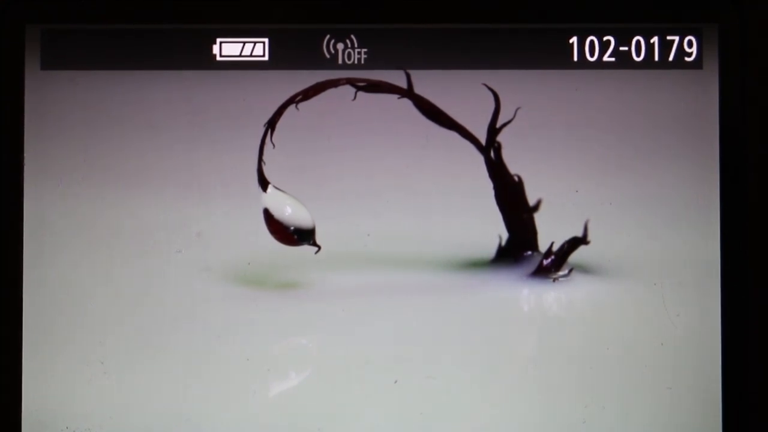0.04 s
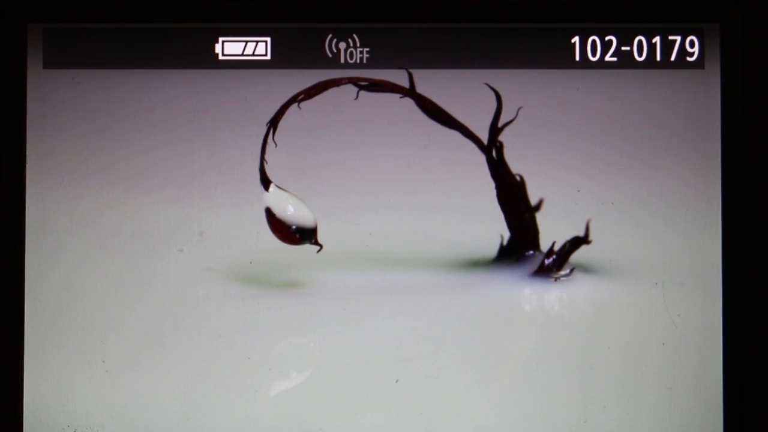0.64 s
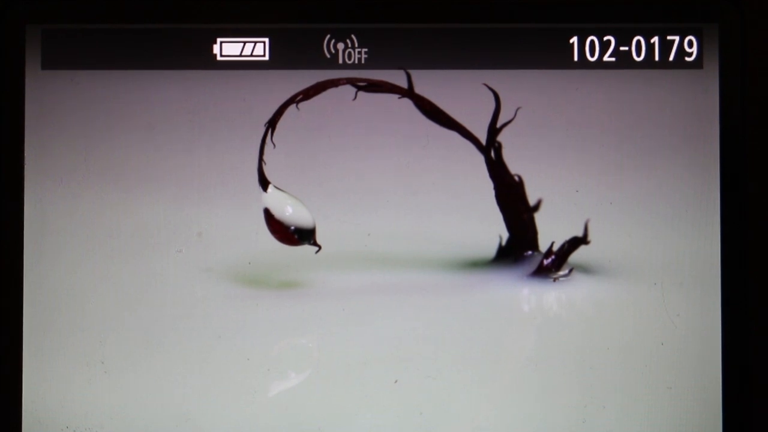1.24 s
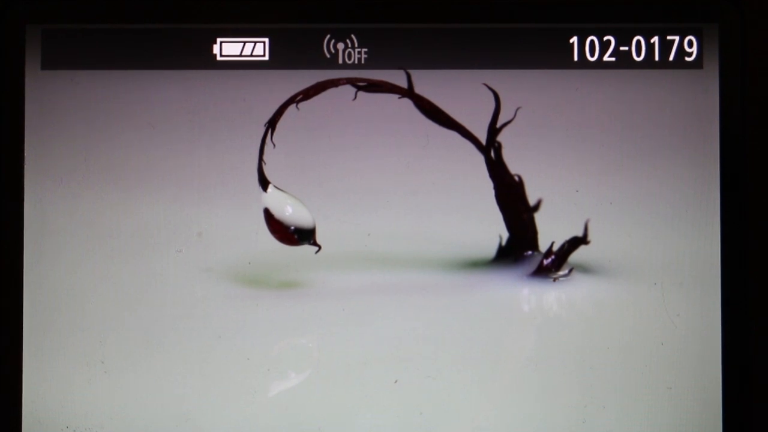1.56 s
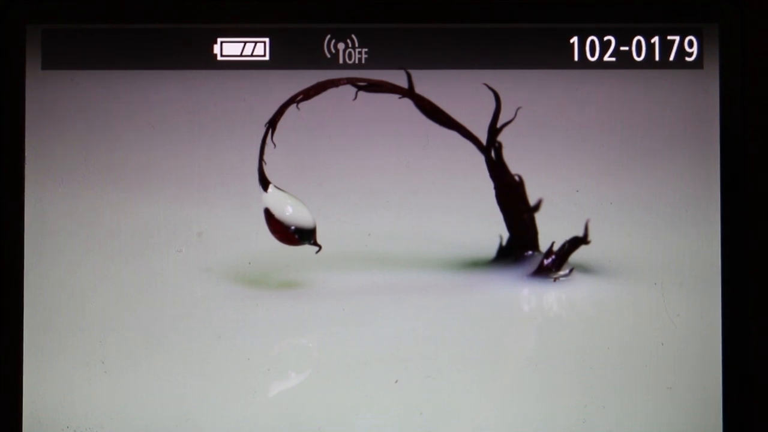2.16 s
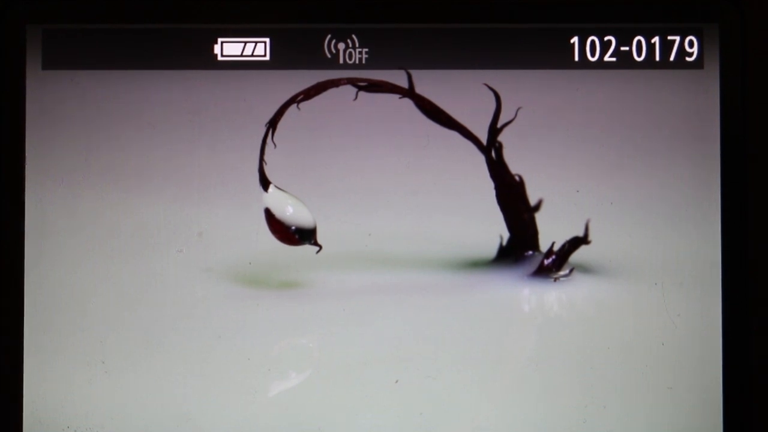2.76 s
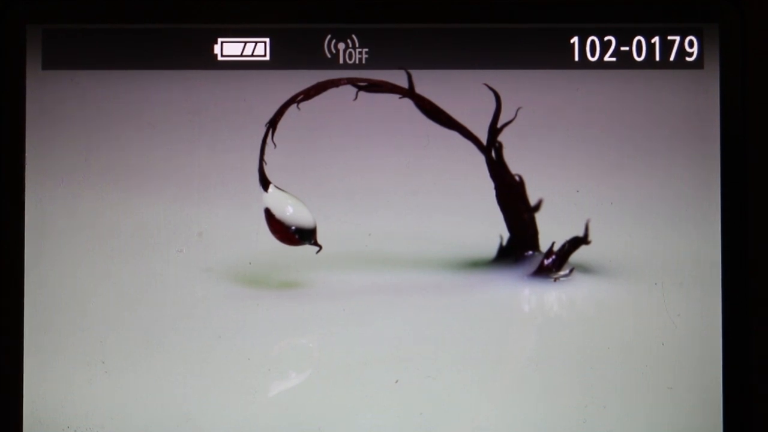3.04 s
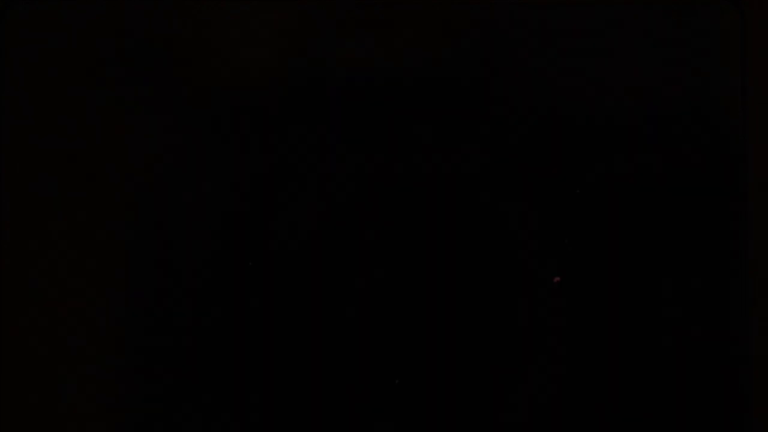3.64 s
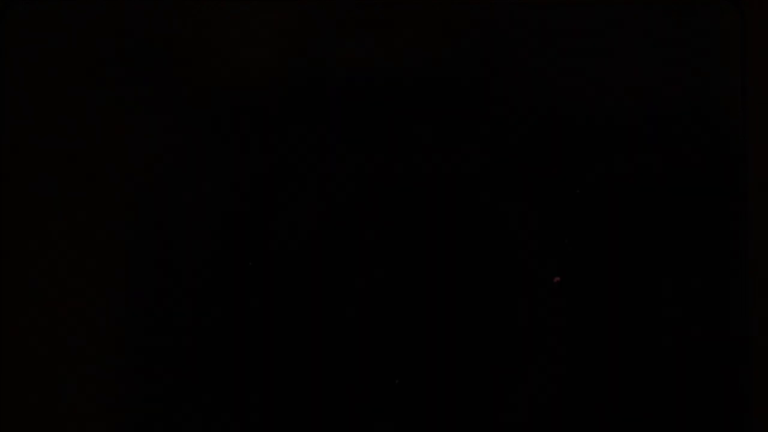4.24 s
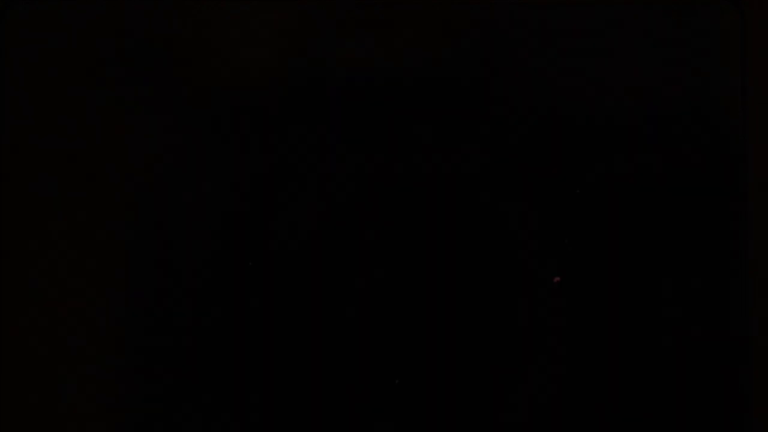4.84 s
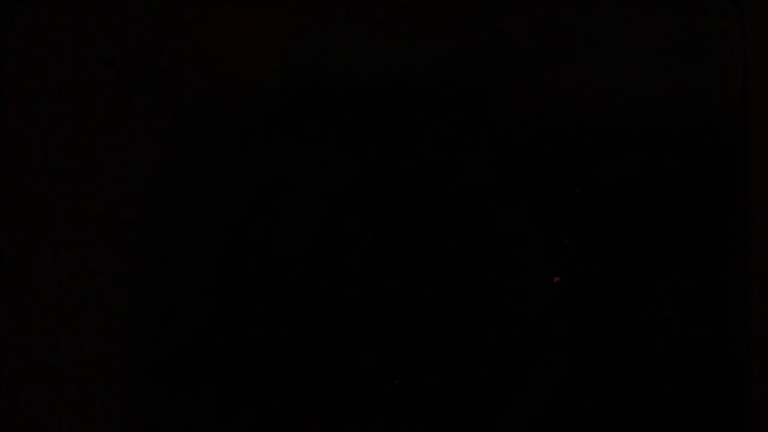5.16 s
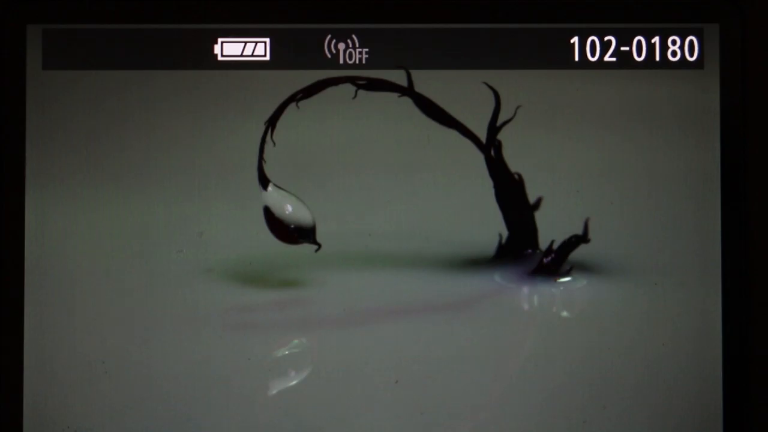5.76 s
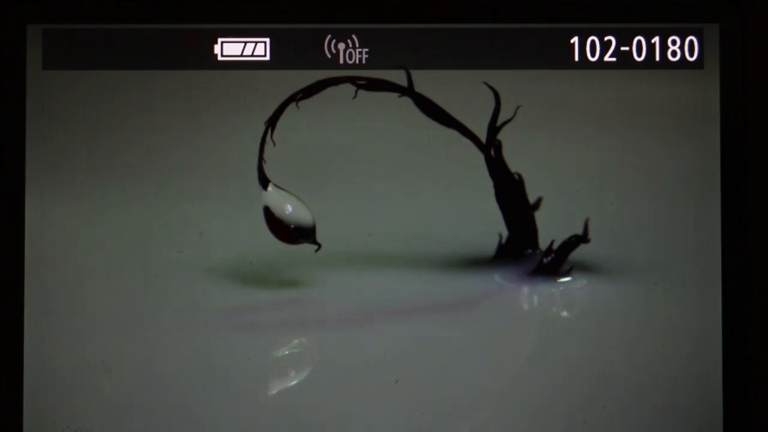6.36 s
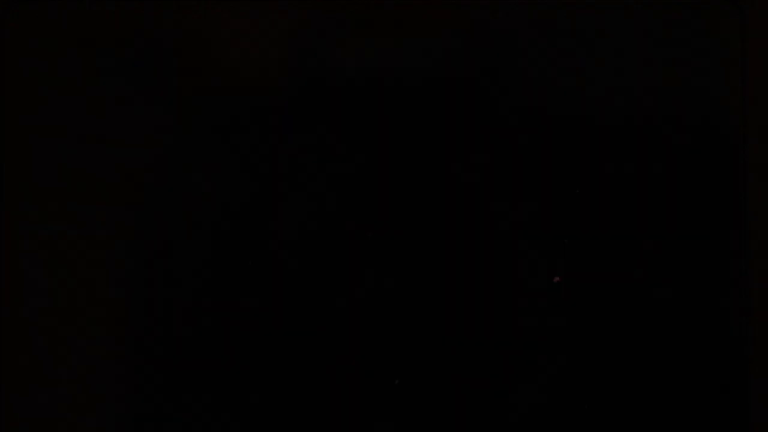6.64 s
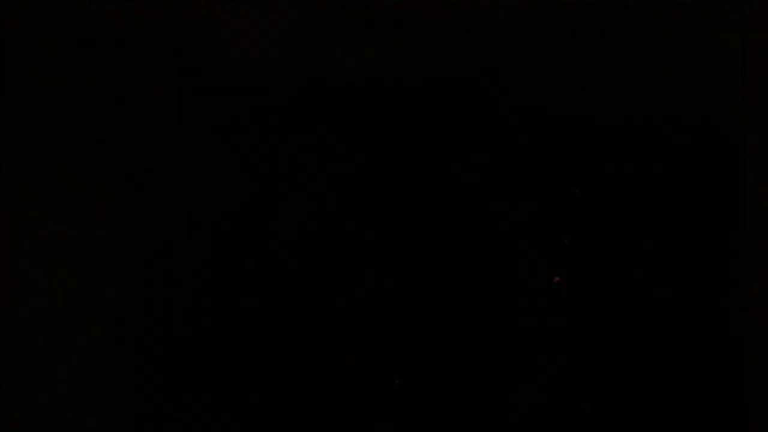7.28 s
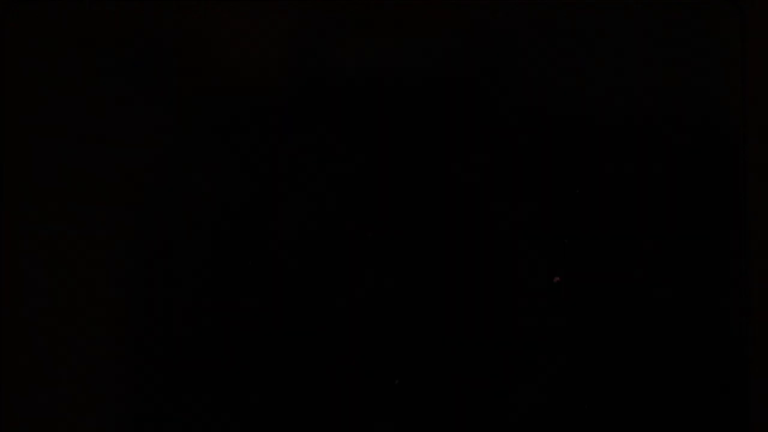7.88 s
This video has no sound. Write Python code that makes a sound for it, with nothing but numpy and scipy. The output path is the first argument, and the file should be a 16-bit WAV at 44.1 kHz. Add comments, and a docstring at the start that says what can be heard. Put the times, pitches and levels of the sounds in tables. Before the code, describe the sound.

In a quiet room, cloth brushes past and something small ticks, followed by a cluster of dull knocks and faint rubbing. After a brief soft scrape, a reflex camera fires close to the microphone with a quick mechanical clack of mirror and shutter. Another short scrape follows, and the camera fires again the same way. The two shots are the loudest sounds, over faint hiss and a low drone.

```python
"""A brush of cloth and a small hard tick, then dull knocks, rubbing and two short scrapes in a quiet room.
Amid this handling a reflex camera fires twice, close to the microphone and louder than all the rest.
Each firing is the same quick chain of blows ringing the body: mirror up, curtains, springs recocked,
mirror down. Rubbing is noise roughened by small slips. Short wall reflections, hiss and a low drone
lie behind."""
import sys
import numpy as np
from scipy import signal
from scipy.fft import rfft, irfft
from scipy.io import wavfile
from scipy.ndimage import uniform_filter1d

SR = 44100
rng = np.random.default_rng(int(sys.argv[2]) if len(sys.argv) > 2 else 0)


def bounce(signal):
    """Save signal as a 16-bit WAV file at the path given by the first command-line argument."""
    frames = np.transpose(np.atleast_2d(signal))
    limited = np.clip(frames, -1, 1)
    pcm = np.round(limited * 32767).astype(np.int16)
    wavfile.write(sys.argv[1], SR, pcm)


N = 353329
FFT_SIZE = 8192
HZ = np.fft.rfftfreq(FFT_SIZE, 1 / SR)

# Each row: time the mirror hits its upper stop in seconds, gain in dB.
FIRINGS = [(4.1850, -0.5), (6.7119, 0)]
# Mirror, curtain and spring blows. Each row: delay from that hit in seconds, level in dB,
# run-up and rattle in seconds, thump and treble in dB, pitch of the struck part in Hz.
FIRING_BLOWS = [(-.003, -28.5, .0059, .001, 0.5, 3, 2200), (.0002, -19, .0016, .002, 5, 0.5, 2760),
                (.002, -23.5, .0012, .0022, 9, -1, 864), (0.0424, -24, .0001, .0026, -1.5, 3, 7700),
                (0.0485, -27.5, .0001, .0014, -2, 6, 12500), (.053, -28.5, .001, .0014, 0, 3.5, 1800),
                (0.0571, -20, .00005, .0016, 4, 7, 2950), (0.064, -26.5, .0005, .0025, 1, -11, 3720),
                (.082, -17, .0008, .0023, -5, -4, 3320), (.0894, -29, .0015, .0031, 1, 3.5, 3820),
                (.096, -29.5, .0002, .001, -7, -12, 3600), (.106, -25.5, .001, .0034, -6, 4.5, 2700),
                (0.108, -36.5, .0004, .0015, -4.5, 15.5, 13000), (.122, -23, .0018, .0055, 3.5, 1.5, 780)]
# Each row: time in seconds, then as in FIRING_BLOWS from the level on.
RELEASE_CLICKS = [(6.686, -43, .0002, 0.0023, -5, 6, 3205), (6.6893, -34.5, 0.00017, 0.00077, 0, 1, 2790)]
# One row: run-up and rattle in seconds, thump and treble in dB, pitch in Hz.
REBOUND_SHAPE = (0.17, 0.01, 2, 0, 1900)
# Each row: frequency in Hz, width in Hz, level in dB.
CAMERA_MODES = [(238, 300, -14.5), (412, 140, -17.5), (594, 96, -6), (850, 170, 2), (1310, 520, -6),
                (2130, 410, -1.5), (2600, 330, 1.5), (2990, 405, 4), (3730, 510, 2), (4130, 230, -3),
                (4930, 950, -7.5), (6400, 1600, -6.5), (7960, 1500, -6.5), (9900, 3300, -12.5),
                (13000, 3000, -19)]


def shutter(rebound_count=3, first_s=.137, gap_s=.023, first_db=-26.5, loss_db=3.5):
    """The release clicks; springs drive each firing alike, and the mirror settles in weakening rebounds."""
    rebounds = [(first_s + k * gap_s, first_db - k * loss_db, *REBOUND_SHAPE)
                for k in range(rebound_count)]
    rows = [(hit_s + delay_s, db + gain_db, *shape)
            for hit_s, gain_db in FIRINGS for delay_s, db, *shape in FIRING_BLOWS + rebounds]
    return blows(RELEASE_CLICKS + rows, CAMERA_MODES, part_db=2.5)


# Each row: time in seconds, level in dB, rattle in seconds, pitch in Hz.
KNOCKS = [(1.411, -53.5, .004, 915), (1.539, -42.5, 0.008, 630), (1.583, -38, 0.021, 590),
          (1.6255, -35.5, 0.002, 830), (1.641, -30, 0.015, 760), (1.656, -31, 0.0065, 584),
          (1.669, -29, 0.023, 1900), (1.688, -28.5, 0.021, 550), (1.7, -27, 0.027, 550),
          (1.762, -36.5, 0.005, 450), (1.773, -33.5, 0.014, 424), (3.24, -53.5, 0.0064, 1140),
          (4.034, -58.5, 0.004, 1370), (6.5, -52.5, 0.0029, 2630), (6.599, -48, 0.0029, 1240)]
# Each row: frequency in Hz, width in Hz, level in dB.
TABLE_MODES = [(189, 220, -11), (404, 160, -15.5), (630, 410, -5.5), (1200, 150, -4), (1865, 550, -3),
               (2640, 400, -5), (7350, 10000, -19)]


def knocks(run_up_share=.11, treble_db=-3.5):
    """Dull knocks ring the table: long ones start softly, low ones thump."""
    rows = []
    for time_s, db, rattle_s, hz in KNOCKS:
        thump_db = 13 - 4.5 * np.log2(hz / 600)
        rows.append((time_s, db, run_up_share * rattle_s, rattle_s, thump_db, treble_db, hz))
    return blows(rows, TABLE_MODES, part_db=3.5, part_width=0.32)


# Each row: time in seconds, level in dB, run-up and rattle in seconds, thump and treble in dB, pitch in Hz.
TICKS = [(.7861, -35, 0.000059, 0.0023, 1.5, -3, 3670), (.812, -43, 0.014, 0.0046, 9, -1, 1240),
         (2.927, -61.5, 0.00034, .001, -10, 3, 9000)]
# Each row: frequency in Hz, width in Hz, level in dB.
TICK_MODES = [(656, 250, -3.5), (1240, 310, -3), (1940, 480, 0.5), (3580, 740, -1), (4770, 970, 0.5),
              (6030, 800, -2.5), (8140, 1300, -10), (11800, 2300, -19)]


def ticks():
    """Light blows ring a small hard object."""
    return blows(TICKS, TICK_MODES, part_db=-1)


# Each row: peak time in seconds, level in dB, swell and fade in seconds, relative hiss in dB, pitch in Hz.
STROKES = [(.89, -65, 0.0095, 0.053, -10, 880), (1.455, -59.5, .02, 0.021, -10, 700),
           (1.564, -50, 0.013, 0.034, -5.5, 2320), (1.646, -39.5, .005, 0.051, -17, 2620),
           (1.76, -58.5, 0.062, .05, 8, 2400), (1.93, -61, 0.059, 0.036, 6.5, 2400),
           (2.105, -47.5, 0.028, 0.017, -1, 2300), (2.128, -48.5, 0.016, 0.03, -7, 2880),
           (2.175, -53, 0.013, 0.024, -1.5, 2630), (2.214, -47, 0.0074, .042, -2, 4740),
           (2.425, -59, 0.011, 0.033, -2, 2780), (2.603, -54.5, .013, 0.036, -11.5, 2380),
           (2.825, -52.5, .018, 0.021, -10.5, 2850), (3.258, -57, 0.0079, 0.025, -12.5, 990),
           (5.812, -58.5, .016, 0.025, -10, 2760), (6.621, -61, 0.046, 0.11, -7, 1190)]
# Two spectra of rubbing. Each row: frequency in Hz, level in dB.
FRICTION_SPECTRUM = [(350, -27), (650, -2.5), (1150, -0.5), (1750, -2), (2180, 0), (2360, 2.5),
                     (2560, -1.5), (3050, -4.5), (3500, -6), (6000, -56)]
HISS_SPECTRUM = [(2500, -12.5), (4000, -2), (5000, -3), (7500, -2.5), (10000, -6), (14000, -13),
                 (16000, -21)]


def strokes():
    """Quick rubs hiss and excite the resonance of the rubbed edge."""
    out = np.zeros(N)
    hiss = amp(curve(HISS_SPECTRUM))
    for peak_s, db, swell_s, fade_s, hiss_db, edge_hz in STROKES:
        friction = peaked(FRICTION_SPECTRUM, edge_hz, width_share=.22, db=3.5)
        add(out, *short_rub(peak_s, swell_s, fade_s, [(friction, db), (hiss, db + hiss_db)]))
    return out


# Each row: time in seconds, pressure in dB.
SLIDE_PRESSURE = [(1.39, -64), (1.456, -63.5), (1.716, -48.5), (1.774, -49.5), (1.908, -57), (2.204, -61),
                  (2.704, -59), (2.894, -59), (2.98, -75)]
# Each row: frequency in Hz, level in dB.
GROAN_SPECTRUM = [(70, -20), (150, -8), (230, -4.5), (295, -7), (335, 1.5), (400, -3), (460, -7.5),
                  (800, -14), (1500, -69)]


def slide(groan_db=1, friction_db=-2, hiss_db=-9.5):
    """Something slides slowly over the table; one pressure drives low groan, friction and hiss."""
    out = np.zeros(N)
    times_s, pressure_db = np.transpose(SLIDE_PRESSURE)
    force = amp(np.interp(np.arange(times_s[0], times_s[-1], 1 / SR), times_s, pressure_db))
    layers = [(GROAN_SPECTRUM, groan_db), (FRICTION_SPECTRUM, friction_db), (HISS_SPECTRUM, hiss_db)]
    add(out, times_s[0], rubbing(force, [(amp(curve(spectrum)), db) for spectrum, db in layers]))
    return out


# Each row: midpoint in seconds, level in dB, length in seconds, slips per second.
SCRAPES = [(3.753, -55.5, .082, 510), (5.974, -48.5, .072, 480)]
# One list per scrape. Each row: frequency in Hz, width in Hz, level in dB.
SCRAPE_MODES = [
    [(567, 45, 20.5), (1150, 32, 17), (1750, 74, 14), (2570, 190, 9), (3300, 700, 1), (3970, 170, 10.5),
     (5190, 250, -6), (7280, 300, -1), (880, 3400, 1), (8700, 2600, -11)],
    [(380, 59, 3.5), (1170, 42, 4), (1780, 62, 3.5), (2520, 120, 8), (3360, 150, 5), (3725, 140, 6.5),
     (4090, 140, 3), (3180, 1600, -5), (5800, 980, -9), (7840, 1900, -8.5), (910, 3500, -10.5)],
]


def scrapes(jitter=0.28, grit=0.31):
    """An edge stutters over a surface in quick runs of uneven slips that ring it."""
    out = np.zeros(N)
    for (middle_s, db, length_s, slip_hz), modes in zip(SCRAPES, SCRAPE_MODES):
        t = np.arange(-length_s, length_s, 1 / SR)
        slip_count = np.cumsum(slip_hz * np.exp(jitter * wander(len(t), span=100))) / SR
        slips = np.diff(np.floor(slip_count), prepend=0) + grit * rng.standard_normal(len(t))
        envelope = np.maximum(np.cos(np.pi * t / length_s), 0) ** 2
        add(out, middle_s - length_s, amp(db) * unit_rms(ring(slips * envelope, resonances(modes))))
    return out


# Each row: peak time in seconds, level in dB, swell and fade in seconds.
BRUSHES = [(.639, -42.5, 0.0065, 0.011), (.648, -44.5, 0.004, 0.021)]
# Each row: frequency in Hz, level in dB.
CLOTH_SPECTRUM = [(200, -15), (600, -8.5), (950, -16), (1190, -4), (1500, -13), (4200, -14.5), (8500, -9),
                  (11900, -12.5), (13500, -25), (16000, -24)]


def cloth():
    """Cloth brushes past in soft, overlapping contacts."""
    out = np.zeros(N)
    for row in BRUSHES:
        add(out, *contact(*row, amp(curve(CLOTH_SPECTRUM))))
    return out


# Each row: peak time in seconds, level in dB, swell and fade in seconds, pitch in Hz.
SHUFFLES = [(2.232, -55, .015, 0.036, 130), (5.676, -63, 0.03, 0.13, 171.3),
            (6.574, -50.5, 0.0084, 0.046, 112), (7.195, -58, 0.017, 0.13, 200),
            (7.36, -55.5, 0.033, 0.048, 324), (7.882, -56.5, 0.025, 0.037, 260)]
# Each row: frequency in Hz, level in dB.
RUMBLE_SPECTRUM = [(60, -35), (100, -1), (170, 2), (260, -3.5), (370, -7.5), (520, -12.5), (1500, -30.5)]


def shuffles():
    """Soft shuffles and bumps rumble, each with one low resonance."""
    out = np.zeros(N)
    for peak_s, db, swell_s, fade_s, hz in SHUFFLES:
        rumble = peaked(RUMBLE_SPECTRUM, hz, width_share=0.28, db=3.5)
        add(out, *short_rub(peak_s, swell_s, fade_s, [(rumble, db)]))
    return out


# Each row: frequency in Hz, time to fall 60 dB in seconds.
ROOM_T60 = [(150, 0.41), (700, .21), (3000, 0.18), (8000, .21), (15000, .075)]
# Each row: frequency in Hz, gain in dB.
ROOM_SPECTRUM = [(150, 4), (560, -2), (820, -5.5), (1300, 2.5), (2200, 0.5), (3200, -2.5), (5000, -3),
                 (8000, -3.5), (14000, -3)]


def room(x, build_s=0.0012, hold_s=0.034):
    """Wall reflections build and hold for a moment, then each band dies at its own speed."""
    slots = np.arange(100, SR // 2, 12)
    echoes = np.zeros(SR)
    echoes[slots + rng.integers(0, 12, len(slots))] = rng.choice([-1, 1], len(slots))
    hz, t, bands = signal.stft(echoes, SR, nperseg=256)
    fade_db = -60 * np.maximum(t - hold_s, 0) / curve(ROOM_T60, hz)[:, None]
    tail = signal.istft(bands * amp(fade_db) * (1 - np.exp(-t / build_s)), SR, nperseg=256)[1]
    response = ring(tail / np.linalg.norm(tail), amp(curve(ROOM_SPECTRUM)))
    return signal.oaconvolve(x, response)[:N]


# Each row: frequency in Hz, level in dB.
AIR_SPECTRUM = [(24, -82), (40, -55), (77, -9.5), (185, -9.5), (215, -6), (312, -9.5), (337, -13.5),
                (392, -11), (467, -12.5), (503, -13), (715, -15.5), (2570, -18), (5050, -25), (9450, -25.5),
                (16000, -34.5)]
# Each row: frequency in Hz, width in Hz, level in dB.
DRONE_MODES = [(97, 4.6, -2.5), (117, 14, -6.5), (211.2, 11, 0.5)]


def air(hiss_db=-64.5, drone_db=-74):
    """Steady hiss and the drone of low room resonances."""
    hiss = ring(rng.standard_normal(N), amp(curve(AIR_SPECTRUM)))
    drone = ring(rng.standard_normal(N), resonances(DRONE_MODES))
    return amp(hiss_db) * unit_rms(hiss) + amp(drone_db) * unit_rms(drone)


def blows(rows, modes, part_db, part_width=0.27):
    """Each blow rings the shared modes and the struck part; heavy parts add thump, thin ones treble."""
    out = np.zeros(N)
    for time_s, db, rise_s, fall_s, thump_db, treble_db, hz in rows:
        tilt_db = curve([(900, thump_db), (2400, 0.025), (3900, 0.017), (6500, treble_db)])
        gain = resonances([*modes, (hz, part_width * hz, part_db)]) * amp(tilt_db)
        add(out, *contact(time_s, db, rise_s, fall_s, gain))
    return out


def contact(peak_s, db, rise_s, fall_s, gain, snap=0.46, hard_s=0.00032):
    """A force that swells, rattles and dies rings an object; db is its energy as rms over 5 ms."""
    lead = SR // 15
    t = np.arange(-lead, SR // 5) / SR
    envelope = np.exp(np.minimum(t, 0) / max(rise_s, 1e-5) - np.maximum(t, 0) / max(fall_s, 1e-4))
    spectrum = rfft(rng.standard_normal(len(t)) * np.sqrt(envelope))
    flat_noise = irfft(spectrum / (abs(spectrum) + 1e-12), len(t))
    force = flat_noise * np.sqrt(envelope)
    force[lead] += snap * np.exp(-rise_s / hard_s) * np.linalg.norm(force)  # spike of a sudden blow
    sound = unit_rms(ring(force, gain)) * amp(db) * np.sqrt(.005 * SR / len(t))
    return peak_s - lead / SR, sound


def short_rub(peak_s, swell_s, fade_s, layers, rounding=0.94):
    """Rubbing swells to a rounded peak and dies away."""
    t = np.arange(-.3, .6, 1 / SR)
    from_peak = t / np.where(t < 0, swell_s, fade_s)
    force = np.exp(rounding - np.hypot(from_peak, rounding))
    return peak_s + t[0], rubbing(force, layers)


def rubbing(force, layers, grain_db=1.0):
    """Surfaces catch in small uneven slips that drive all layers (gain by frequency, dB) together."""
    n = len(force)
    slips = amp(grain_db * wander(n, span=180))
    return force * sum(amp(db) * unit_rms(ring(slips * rng.standard_normal(n), gain))
                       for gain, db in layers)


def resonances(modes, steepness=1.78):
    """Gain of a set of modes, each falling away on both sides of its pitch."""
    power = 0
    for hz, width_hz, db in modes:
        damping = (HZ * width_hz) ** 2
        power += amp(2 * db) * (damping / ((HZ ** 2 - hz ** 2) ** 2 + damping)) ** steepness
    return np.sqrt(power)


def peaked(spectrum, hz, width_share, db):
    """Gain of a broad spectrum with one resonance on top."""
    return np.hypot(amp(curve(spectrum)), resonances([(hz, width_share * hz, db)]))


def ring(x, gain):
    """Passes x through the minimum-phase filter with this gain."""
    log_gain = np.log(np.maximum(gain, 1e-5))
    mirrored = np.concatenate([log_gain, log_gain[-2:0:-1]])
    response = np.fft.ifft(np.exp(np.conj(signal.hilbert(mirrored)))).real
    return signal.oaconvolve(x, response[:FFT_SIZE // 2])[:len(x)]


def wander(n, span):
    """Noise smoothed over span samples, rms 1."""
    return unit_rms(uniform_filter1d(rng.standard_normal(n), size=span))


def curve(points, hz=HZ):
    """Interpolates a table on a log-frequency axis."""
    point_hz, values = np.transpose(points)
    return np.interp(np.log(hz + 1), np.log(point_hz + 1), values)


def amp(db):
    """Decibels to gain."""
    return 10 ** (np.asarray(db) / 20)


def unit_rms(x):
    """Scales to rms 1."""
    return x / np.sqrt(np.mean(x ** 2) + 1e-20)


def add(mix, start_s, sound):
    """Mixes a sound in at start_s."""
    part = mix[round(start_s * SR):][:len(sound)]
    part += sound[:len(part)]


def scene(camera_wet_db=-3, tick_wet_db=-10, handling_wet_db=-12):
    """Camera and handling sounds with their reflections, over the room's air."""
    camera = shutter()
    ticking = ticks()
    handling = knocks() + scrapes() + cloth() + slide() + strokes() + shuffles()
    walls = room(amp(camera_wet_db) * camera + amp(tick_wet_db) * ticking + amp(handling_wet_db) * handling)
    return (camera + ticking + handling + walls + air())[None]


def record(dry, low_cut_hz=75, band_limit_hz=15850):
    """The microphone's low cut, then the band limit."""
    low_cut = signal.butter(5, low_cut_hz, "high", fs=SR, output="sos")
    band_limit = signal.firwin(511, band_limit_hz, window=("kaiser", 9), fs=SR)
    return signal.oaconvolve(signal.sosfilt(low_cut, dry), band_limit[None], "same")


dry = scene()
out = record(dry)
bounce(out)
```